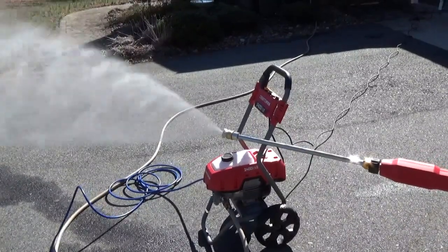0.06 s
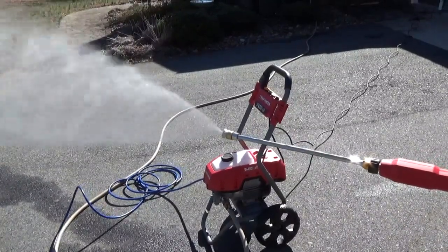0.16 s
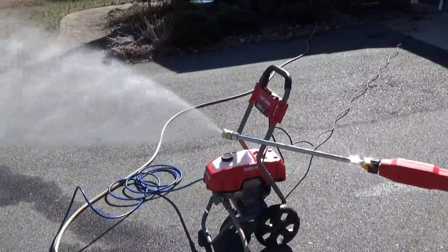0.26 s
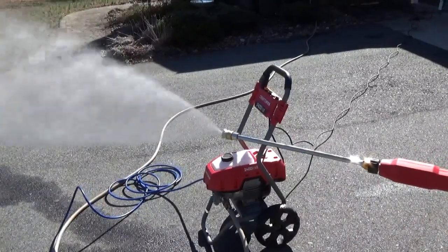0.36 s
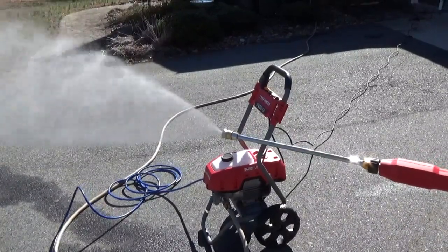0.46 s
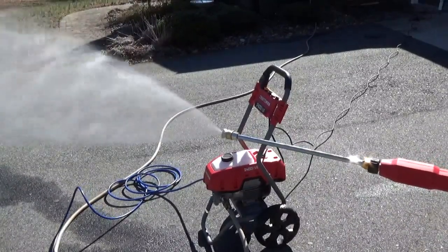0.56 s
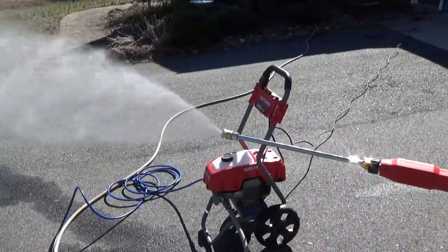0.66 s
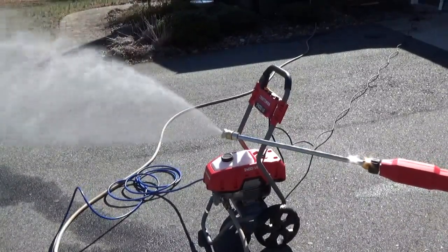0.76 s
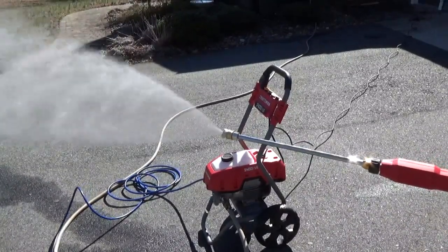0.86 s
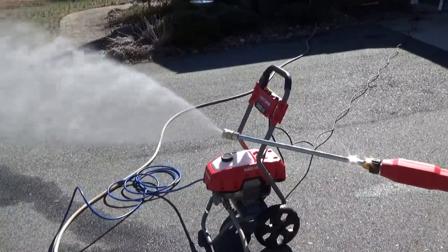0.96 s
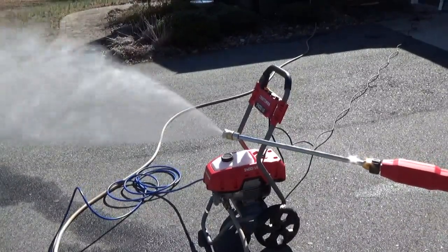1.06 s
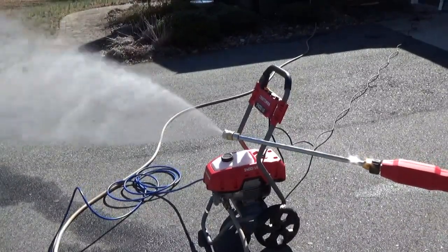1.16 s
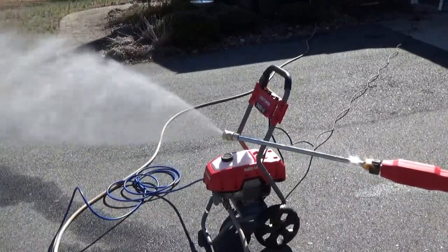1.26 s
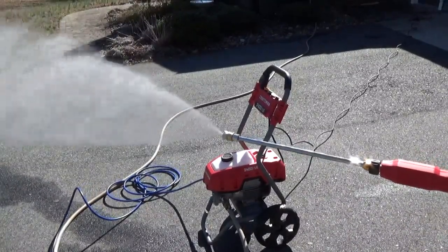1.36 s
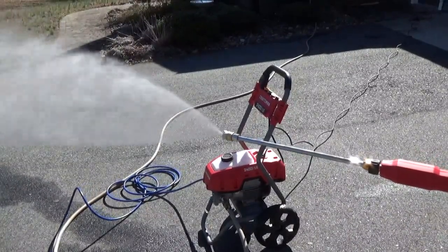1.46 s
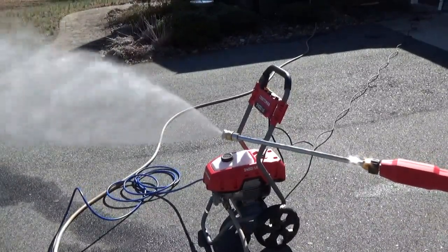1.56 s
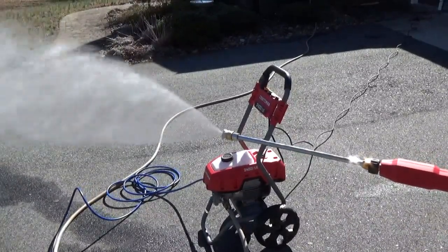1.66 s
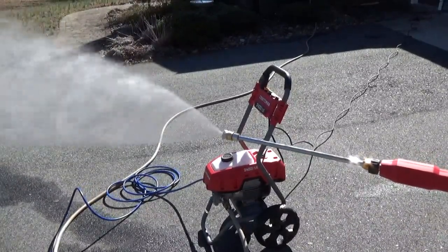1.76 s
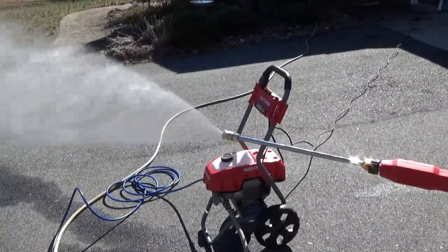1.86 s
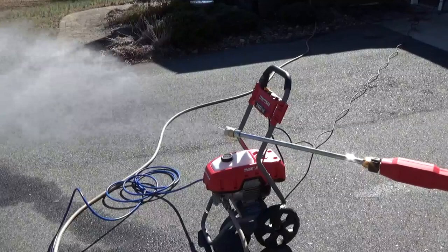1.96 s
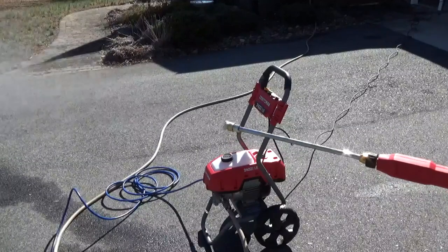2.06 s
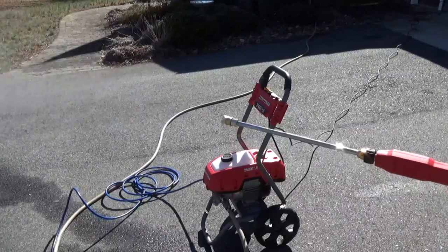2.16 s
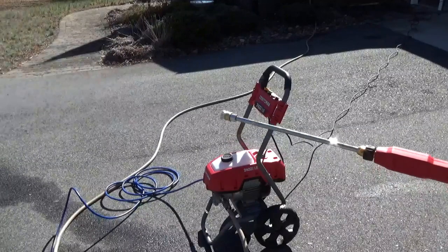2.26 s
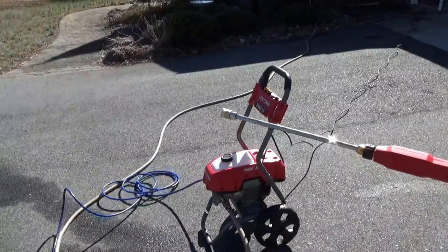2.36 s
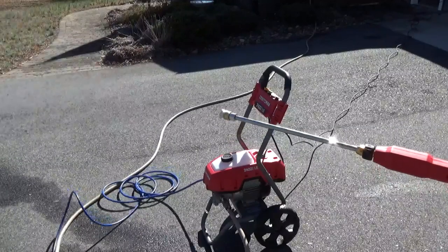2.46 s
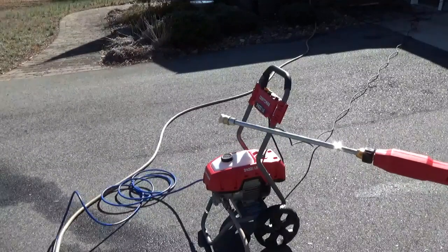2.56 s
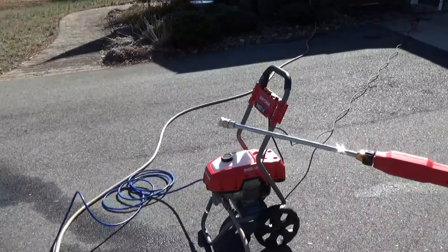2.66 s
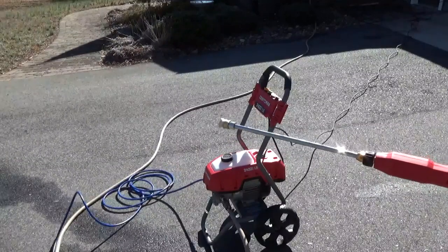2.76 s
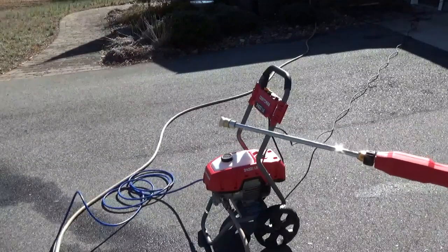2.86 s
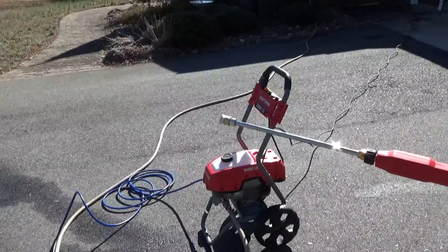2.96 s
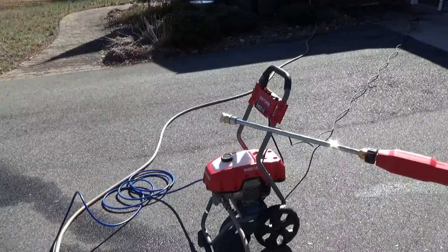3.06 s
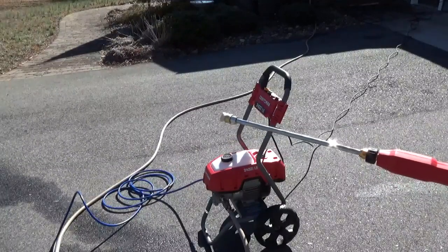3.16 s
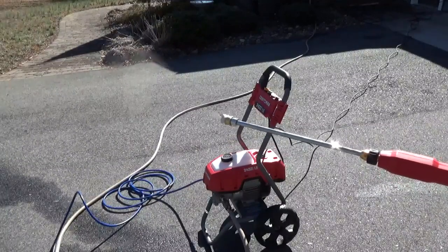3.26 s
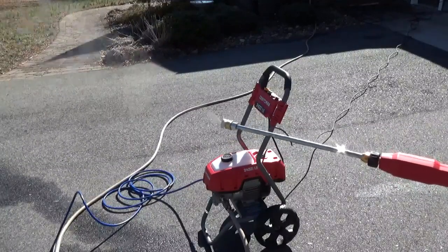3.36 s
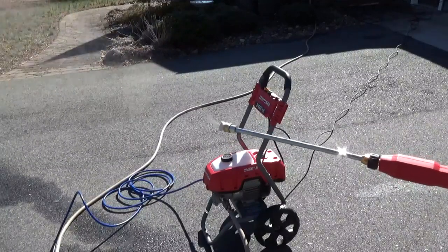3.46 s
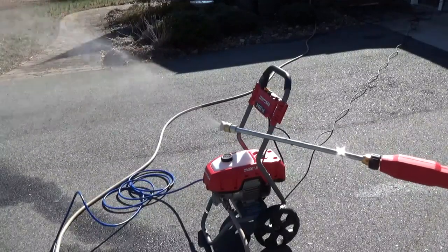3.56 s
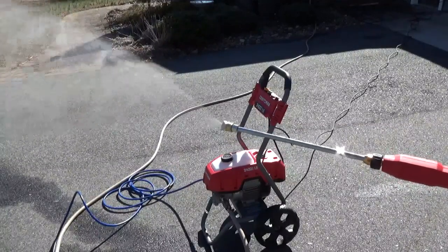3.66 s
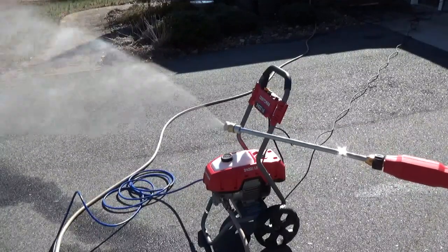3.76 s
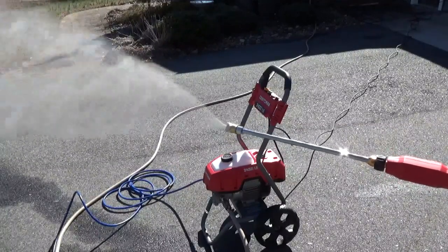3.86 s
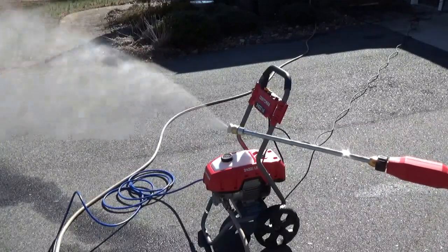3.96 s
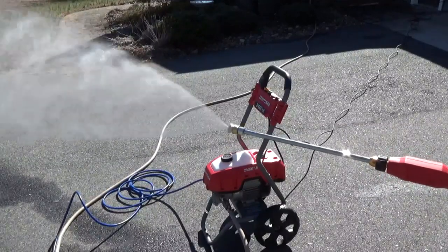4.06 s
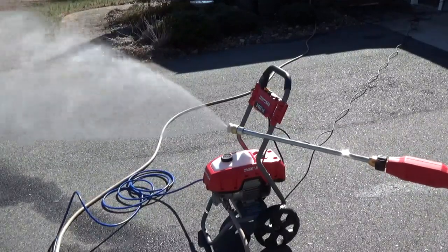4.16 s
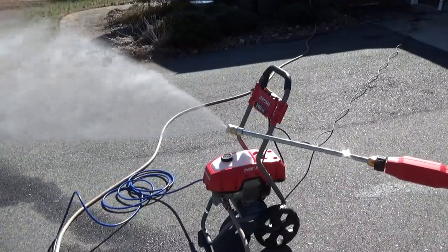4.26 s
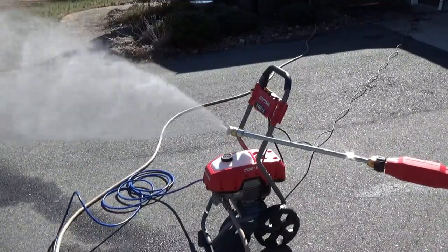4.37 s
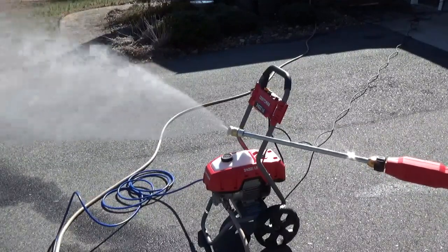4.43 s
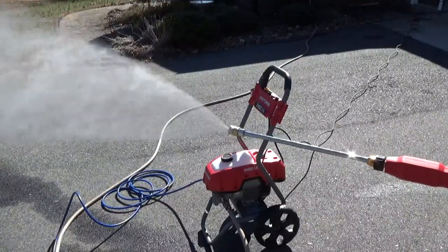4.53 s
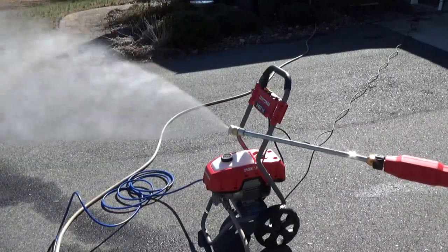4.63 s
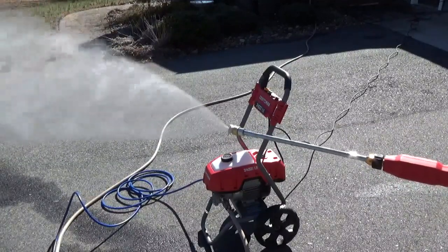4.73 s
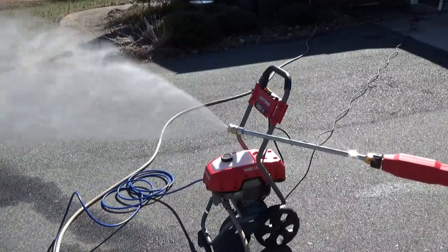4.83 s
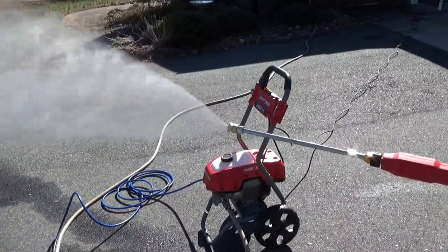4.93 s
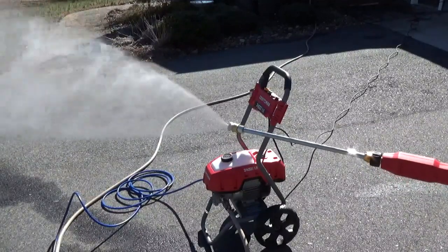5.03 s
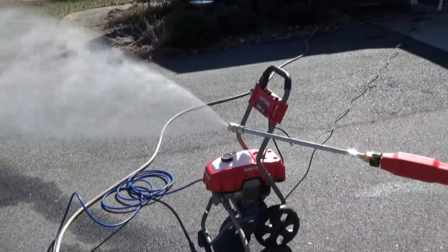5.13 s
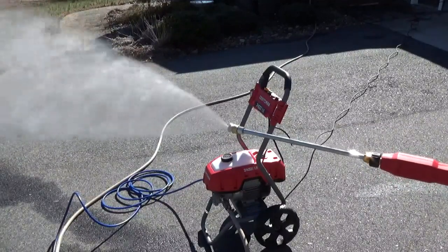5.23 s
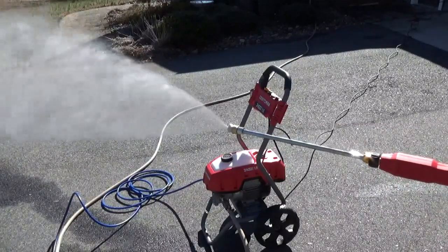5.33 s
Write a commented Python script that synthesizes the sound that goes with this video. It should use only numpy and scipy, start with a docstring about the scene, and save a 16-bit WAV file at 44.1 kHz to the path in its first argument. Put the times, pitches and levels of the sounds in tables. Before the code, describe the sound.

From 0 to about 2 s an electric pressure washer runs steadily outdoors: a loud, buzzing whine rich in overtones, a pulsing casing rattle, and a thin, bright hiss of spray. At 1.97 s the spray stops abruptly; the motor jolts and strains, sagging slightly in pitch, harsher and throbbing, with metallic valve ticking and chatter. At 2.34 s it cuts out with a brief airy vent and ringing groan, then a short squeal climbs and thins away by 2.6 s. The pause is very quiet: tiny ticks, a regular train of faint high insect chirps until about 3.05 s, dull far traffic. At 3.27 s a sharp tick and fading watery spurt arrive, then a small switch snap at 3.3 s. Near 3.5 s the motor catches with a groan and rattle, briefly overshoots in pitch and settles; full spray and whine continue steadily to the end. Close stereo, machine slightly right.

```python
"""A pressure washer's electric motor whines and rattles while its nozzle hisses over a driveway.
The trigger is released: the pump strains against the shut valve, cuts out, vents and squeals to a halt.
Insects chirp in the pause. The trigger is pulled: stored pressure spurts out, then the motor restarts.
The whine is a sum of sine waves at multiples of the shaft speed; hiss, rattle and groan are filtered noise;
the squeal is a climbing tone with overtones; chirps and clicks are short tones, some with a little noise."""
import sys
import numpy as np
from scipy.fft import rfft, irfft, next_fast_len
from scipy.io import wavfile
from scipy.ndimage import uniform_filter1d, map_coordinates

SR = 44100
rng = np.random.default_rng(int(sys.argv[2]) if len(sys.argv) > 2 else 0)


def pcm_store(signal):
    """Save signal as 16-bit PCM."""
    levels = np.round(np.clip(np.atleast_2d(signal), -1, 1) * 32767)
    wavfile.write(sys.argv[1], SR, levels.astype(np.int16).T)


N = 238051
T = np.arange(N) / SR  # the time of every sample (s)

# In the spectrum tables below, levels are per Hz and only their balance matters.
# Far traffic over time: time_s, level_db
TRAFFIC_LEVEL = [(2.6, -51.5), (2.85, -51), (2.95, -54.5), (3.25, -55)]
# Tone colour of the far traffic: pitch_hz, level_db
TRAFFIC_SPECTRUM = [(35, -14), (70, -0.5), (118, -5), (160, -1.5), (220, -5.5), (518, -12.5), (800, -13.5),
                    (1100, -12.5), (1800, -19), (2580, -24.5), (5000, -36.5), (12000, -60.5)]
# How alike left and right are in most of the noises: pitch_hz, likeness (1 = identical)
LIKENESS = [(60, 0.54), (170, 0.86), (480, 0.72), (1350, 0.84), (3820, 0.93), (10800, 0.92)]
# A late chirp, then a click ringing near 2700 Hz: start_s, low_note_change_db
LATE_SOUNDS = [(3.018, 0), (3.049, 5)]
# Short ticks: start_s, level_db, pitch_hz
TICKS = [(2.5405, -28, 10000), (2.5935, -45, 6300), (2.6322, -26, 9100), (2.633, -28, 7920),
         (2.6502, -33, 10120), (2.6575, -39, 9200), (2.695, -46, 6000), (3.0495, -40, 3300),
         (3.266, -10, 7000)]
# The pressure switch snapping: start_s, level_db
SWITCH_SNAPS = [(3.301, -27.5)]
# The switch's box ringing: pitch_hz, level_db, time_to_fall_60_db_s
SWITCH_RINGS = [(420, -4, 0.043), (660, 0.5, 0.037)]
# Tone colour of the venting: pitch_hz, level_db
VENT_SPECTRUM = [(2500, -21), (3500, -9.5), (4000, -12), (4400, -4), (4800, -1), (5100, -9), (5450, -5),
                 (6100, -8.5), (6900, -11), (8200, -10), (9500, -8.5), (11200, -20.5)]
# Narrow bands in the venting: pitch_hz, width_hz, level_db
VENT_BANDS = [(4800, 120, -1), (5400, 110, -1)]
# Resonances of the pump housing: pitch_hz, width_hz, level_db
HOUSING_MODES = [(819, 86, 2.5), (1280, 18, -3.5), (1462, 44, -3.5), (1850, 96, -1), (2157, 40, -2.5),
                 (2440, 36, -0.5), (2890, 30, -7), (3470, 200, -13.5)]
# The squeal's basic tone, then its overtones in order: level_db
SQUEAL_OVERTONES = [0, -5, -10, -18, -26, -25, -20, -28, -28, -26, -22, -24, -27]
# Tone colour of the nozzle's fan of spray: pitch_hz, level_db
SPRAY_SPECTRUM = [(1650, -43.5), (2800, -11), (2930, -10.5), (3790, -7), (6130, -0.5), (7800, 0),
                  (9870, -3), (11000, -7.5), (14300, -39), (22000, -120)]
# Stored pressure leaving the lance: time_s, level_db
SPURT_LEVEL = [(3.266, -19), (3.275, -20.5), (3.33, -22.5), (3.38, -29), (3.42, -31), (3.46, -27.5),
               (3.5, -21.5)]
# Tone colour of that spurt: pitch_hz, level_db
SPURT_SPECTRUM = [(150, -34), (500, -26), (800, -17), (1460, -13), (2250, -6.5), (4000, -2), (6540, 1),
                  (9910, -6), (11200, -12)]
# Mains water following the spurt: time_s, level_db
SURGE_LEVEL = [(3.27, -54.5), (3.33, -38.5), (3.4, -33.5), (3.48, -36)]
# The whine while spraying freely: shaft_multiple, level_db
FREE_WHINE = [(1, -37), (2, -39), (3, -27), (4, -29), (5, -26), (6, -23), (7, -26), (8, -30), (9, -14),
              (10, -27), (11, -20), (12, -16), (13, 0), (14, -11), (15, -22), (16, -25), (17, -24),
              (18, -23), (19, -25), (20, -22), (21, -25), (22, -23), (23, -30), (24, -23), (25, -18),
              (26, -15), (27, -24), (28, -20), (29, -15), (30, -12), (31, -8), (32, -11), (33, -18),
              (34, -14), (35, -21), (36, -11), (37, -18), (38, -16), (39, -24), (40, -17), (41, -17),
              (42, -15), (43, -20), (44, -18), (45, -25), (46, -20), (47, -16), (48, -22), (49, -24),
              (50, -24)]
# The whine against the shut valve: shaft_multiple, level_db
STRAINED_WHINE = [(1, -38.5), (2, -39.5), (3, -31.5), (4, -36), (5, -20), (6, -23.5), (7, -28), (8, -37),
                  (9, -13), (10, -31), (11, -39), (12, -10.5), (13, -5.5), (14, -2.5), (15, -7),
                  (16, -10.5), (17, -11), (18, -13), (19, -11), (20, -19.5), (21, -10), (22, -28),
                  (23, -15), (24, -36), (25, -16), (26, -8), (27, -35), (28, -26), (29, -15), (30, -13),
                  (31, -5), (32, -1), (33, -9.5), (34, -6), (35, -17), (36, -13), (37, -10), (38, 0),
                  (39, -18), (40, -9), (41, -13), (42, -17), (43, -3.5), (44, -17), (45, -26), (46, -21),
                  (47, -10), (48, -24), (49, -7.5), (50, -15)]
# Multiples that jump as the valve shuts: shaft_multiple, change_db
SHUTTING_CHANGE = {5: 5, 6: 4, 9: 4, 12: 10.4, 13: 1.8, 14: 6.3, 18: 7.5, 25: 17, 30: 4, 31: -11, 32: 10,
                   34: 10.6, 37: 5, 38: 6, 39: 15, 40: 9.7, 43: 13, 49: 11}
# Multiples that differ while the restarted pump runs light: shaft_multiple, change_db
LIGHT_CHANGE = {3: -8, 4: -6, 5: -7, 7: -1, 8: -8, 9: 7.1, 12: -8, 13: 1.7, 15: 8.6, 25: 14, 26: -10}
# Lasting change after the restart: shaft_multiple, change_db
RESTART_CHANGE = {6: -3, 12: -1, 13: 1.5, 26: -1, 30: 3, 32: -2.5, 33: -6, 34: -1.5, 35: -4, 43: -4}
# Strong groups in the whine, the low one wavering and the high one pulsing: centre_multiple, phase_bend_rad
STRONG_GROUPS = [(14.5, np.pi), (31.5, .5)]
# Tone colour of the rattling casing: pitch_hz, level_db
CASING_SPECTRUM = [(40, -50), (150, -12.5), (400, -10.5), (780, -1), (1150, -5.5), (1350, -4.5),
                   (1900, 0.5), (2700, -3.5), (3500, -6), (3650, -30), (3900, -14), (8000, -18),
                   (9000, -17.5), (12000, -26)]
# Valve parts ringing: pitch_hz, width_hz, level_db
VALVE_MODES = [(3390, 160, -1.5), (4050, 19, 4.5), (4160, 100, -5), (4800, 39, 0), (5530, 64, -6),
               (6300, 230, -8), (7250, 41, 0.5), (7720, 78, -5), (8230, 270, -9), (9200, 230, -13)]

TOP_HZ = 11010  # the band limit
RELEASE_S, CUT_S, START_S = 1.972, 2.338, 3.49  # trigger released, motor cut, motor running again
# An even train of insect chirps
CHIRP_S, CHIRP_GAP_S, CHIRP_COUNT = 2.6325, .0333, 12
LOW_NOTE_DB, HIGH_NOTE_DB, NOTE_SCATTER_DB = -55.5, -57, 1.8
# Hiss after the cut
VENT_RISE_S, VENT_DB, VENT_HOLD_S, VENT_FALL_DB_PER_S = .016, -23.5, 0.041, 201
WHISTLE_DB, SQUEAL_HISS_DB = -9, -23  # narrow bands against the hiss; hiss against the squeal
# Groan after the cut, dropping as the pump halts and swelling just before
GROAN_DB, GROAN_FALL_DB_PER_S = -17, 100
HALT_S, HALT_DROP_DB = 2.482, -9.5  # a quick drop, with a slower one beside it
JUDDER_S, JUDDER_WIDTH_S, JUDDER_DB = 2.457, .012, 2
# Groan at the restart
CATCH_DB, CATCH_RISE_DB_PER_S, CATCH_FALL_DB_PER_S, CATCH_LENGTH_S = -22, 520, 40, .12
# The squeal: it climbs ever faster while it thins out
SQUEAL_HZ, SQUEAL_CLIMB_HZ_PER_S2 = 800, 3300
SQUEAL_RISE_S, SQUEAL_HOLD_S, SQUEAL_END_S = .014, 0.025, 2.625
SQUEAL_TOP_DB, SQUEAL_THIN_DB = -27.5, -60
SQUEAL_FALL_DB_PER_S = 480  # on average
SQUEAL_TILT_DB = 4  # base treble lift per octave, scaled as the squeal thins
# The spray
JET_DB, JET_STOP_S, JET_RISE_DB_PER_S, JET_FULL_S = -19, 0.013, 340, 3.52
# Motor speed
RUN_RPM, CREEP_RPM_PER_S = 3497.5, .9  # free speed at the beginning and its slow creep
SAG_RPM, SAG_S = 280, .5  # speed lost against the shut valve, and its time constant
OVER_RPM, SETTLE_S = 38, .33  # overshoot at the restart, and its settling
LAG_RPM, CATCH_S = 72, .03  # lag at the restart, and its catching up
# Motor level
TONE_DB, SHUT_TONE_DB, LAG_TONE_DB = -20.5, 1.5, -8  # whine; change as the valve shuts and while lagging
EASE_DB, EASE_S = -3, .04  # the whine eases off just before the cut
RATTLE_DB, STRAIN_RATTLE_DB = -29, 2.5  # rattle; its rise under strain
JOLT_DB, JOLT_S = 4.5, 0.072  # rattle jolts at release and restart
BUILD_S, THROB_S = 0.049, 0.18  # the valve shuts, then strain grows
LIGHT_DULL_DB = -5  # upper multiples while the restarted pump runs light
# The valve under strain
TICK_DB, CHATTER_DB = -27, -33
SEAT_S, UNSEATED_DB, VALVE_FADE_DB_PER_S = 2.11, -5.5, 21


def amp(db):
    """Turn decibels into a plain multiplier."""
    return np.exp(np.asarray(db) * np.log(10) / 20)


def unit(x):
    """Scale a sound to an average (rms) strength of 1."""
    return x / np.sqrt(np.mean(x ** 2) + 1e-20)


def along(points, hz):
    """Read a pitch table between its points, on a logarithmic pitch axis."""
    f, value = np.transpose(points)
    return np.interp(np.log(hz + 1), np.log(f + 1), value)


def between(start_s, end_s):
    """A soft-edged gate: 1 between two times, 0 outside."""
    is_open = (T >= start_s) & (T <= end_s)
    return uniform_filter1d(is_open * 1., size=90, mode="nearest")


def ramp(start_s, length_s):
    """A straight rise from 0 to 1."""
    return np.clip((T - start_s) / length_s, 0, 1)


def fading(start_s, time_s):
    """0 before the start, then 1 dying away exponentially."""
    return (T >= start_s) * np.exp(-np.maximum(T - start_s, 0) / time_s)


def timeline(points):
    """A gate over the table's time span, and its level at every sample."""
    s, level_db = np.transpose(points)
    return between(s[0], s[-1]), np.interp(T, s, level_db)


def wobble(rate):
    """A smooth random curve with rate random points a second."""
    coarse = np.arange(0, N + 16, 16) / SR
    knots = rng.standard_normal(int(N * rate / SR) + 4)
    return np.interp(T, coarse, map_coordinates(knots, [coarse * rate]))


def filtered(x, response):
    """Reshape the spectrum of x by a response that depends on pitch."""
    m = next_fast_len(N + SR // 2)
    return irfft(rfft(x, m) * response(np.fft.rfftfreq(m, 1 / SR)), m)[..., :N]


def coloured(spectrum):
    """The filter described by a spectrum table."""
    return lambda hz: amp(along(spectrum, hz))


def resonant(modes):
    """The response of parts that ring at their own pitches, with alternating signs."""
    def response(f):
        total = 0
        for n, (centre, width, db) in enumerate(modes):
            drag = 1j * f * width
            total = total + (-1) ** n * amp(db) * drag / (centre * centre - f * f + drag)
        return total
    return response


def rush(gain, alike):
    """Filtered stereo noise of rms 1, its sides as alike as the table says."""
    def mid_and_side(hz):
        angle = np.arccos(np.clip(along(alike, hz), -1, 1)) / 2
        return gain(hz) * [np.cos(angle), np.sin(angle)]
    mid, side = filtered(rng.standard_normal((2, N)), mid_and_side)
    return unit(np.array([mid + side, mid - side]))


def add(track, s, db, hz, length):
    """Add a short tone under a bell-shaped envelope."""
    t = np.arange(int(length * SR)) / SR
    bell = np.sin(np.pi * t / length) ** 2
    track[round(s * SR):][:len(t)] += amp(db) * bell * np.sin(2 * np.pi * hz * t)


def street():
    """Far traffic is dull noise; light wind on the microphone openings is a low rumble."""
    _, traffic_db = timeline(TRAFFIC_LEVEL)
    traffic = rush(coloured(TRAFFIC_SPECTRUM), [(50, 0.322), (5000, 0.47)])
    wind = rush(resonant([(42, 25, 0)]), [(40, .7)])
    return amp(traffic_db + 1.19 * wobble(12)) * traffic + amp(-68.0 + 2.96 * wobble(3)) * wind


def insects_and_late_click():
    """Chirps, and one late click, are a high note then a low one, over a thin trill that fades."""
    trill_db = -71.0 - 30 * np.clip(T - 2.95, 0, 1) + 2.5 * wobble(33)
    track = amp(trill_db) * np.sin(2 * np.pi * 2960 * T)
    sounds = [(CHIRP_S + CHIRP_GAP_S * n, 0) for n in range(CHIRP_COUNT)] + LATE_SOUNDS
    scatter = NOTE_SCATTER_DB * rng.standard_normal((len(sounds), 2))
    for (s, db), (low_db, high_db) in zip(sounds, scatter):
        add(track, s - .003, HIGH_NOTE_DB + high_db, 3550, .006)
        add(track, s - .001, LOW_NOTE_DB + db + low_db, 2700, .011)
    return track


def clicks():
    """The switch makes its box ring briefly; ticks are very short tones mixed with bright noise."""
    track = np.zeros(N)
    t = np.arange(2000) / SR
    for s, db in SWITCH_SNAPS:
        ring = sum(amp(db + level - 60 * t / t60) * np.sin(2 * np.pi * hz * t)
                   for hz, level, t60 in SWITCH_RINGS)
        track[round(s * SR):][:len(t)] += ring * (1 - np.exp(-t / 0.0012))
    for s, db, hz in TICKS:
        crack = np.cos(2 * np.pi * hz * t) + .3 * np.diff(rng.standard_normal(len(t) + 1))
        track[round(s * SR):][:len(t)] += amp(db - 60 * t / 0.0022) * crack
    return track


def shudder():
    """A fast, random unsteadiness in level."""
    return amp(1.6 * wobble(120))


def squeal():
    """A climbing tone and its overtones as the pump halts; gives the level and the sound."""
    onset_s = HALT_S - .02
    pitch_hz = SQUEAL_HZ + SQUEAL_CLIMB_HZ_PER_S2 * np.clip(T - onset_s, 0, .2) ** 2
    turn = 2 * np.pi * np.cumsum(pitch_hz) / SR
    drop_db = SQUEAL_THIN_DB - SQUEAL_TOP_DB
    thinned = ramp(onset_s + SQUEAL_RISE_S + SQUEAL_HOLD_S, -drop_db / SQUEAL_FALL_DB_PER_S)
    gate = ramp(onset_s, SQUEAL_RISE_S) * between(0, SQUEAL_END_S)
    level = gate * amp(SQUEAL_TOP_DB + drop_db * thinned ** 0.72)
    tilt_db = SQUEAL_TILT_DB * np.interp(thinned, [0, .45, .9, 1], [0.12, 1, 1.3, 0.72])
    tone = np.zeros(N)
    for k, db in enumerate(SQUEAL_OVERTONES, 1):
        overtone_db = db + tilt_db * np.log2(k) + 4.1 * wobble(60)
        tone += amp(overtone_db) * np.sin(k * turn + .16 * k * wobble(90))
    return level, level * tone


def groan():
    """Noise ringing in the pump housing, once as the pump runs down and again as it catches."""
    judder_db = JUDDER_DB * np.exp(-((T - JUDDER_S) / JUDDER_WIDTH_S) ** 2)
    halt_db = HALT_DROP_DB * (ramp(HALT_S - .01, 0.018) + .6 * ramp(HALT_S, .12))
    fall_db = -GROAN_FALL_DB_PER_S * np.maximum(T - CUT_S, 0)
    stopping = between(CUT_S - .004, START_S - .5) * amp(GROAN_DB + halt_db + judder_db + fall_db)
    peak_s = START_S - .01
    catch_db = CATCH_DB - CATCH_RISE_DB_PER_S * np.maximum(peak_s - T, 0)
    catch_db = catch_db - CATCH_FALL_DB_PER_S * np.maximum(T - peak_s, 0)
    catching = between(0, START_S + CATCH_LENGTH_S) * amp(catch_db)
    housing = resonant(HOUSING_MODES)
    # a little plain noise between the ringing pitches
    walls = lambda f: 0.12 * (f > 300) * (f < 3500) + housing(f)
    return (stopping + catching) * shudder() * rush(walls, LIKENESS)


def rundown():
    """The pump vents with a hiss, groans and squeals to a halt; it groans again as it catches."""
    held = np.maximum(np.maximum(T - CUT_S, 0) - VENT_HOLD_S, 0)
    vent = ramp(CUT_S - VENT_RISE_S / 2, VENT_RISE_S) * amp(VENT_DB - VENT_FALL_DB_PER_S * held)
    squeal_level, squealing = squeal()
    hiss = vent + amp(SQUEAL_HISS_DB) * squeal_level
    whistle = amp(WHISTLE_DB) * rush(resonant(VENT_BANDS), LIKENESS)
    air = rush(coloured(VENT_SPECTRUM), LIKENESS) + whistle
    return hiss * shudder() * air + groan() + squealing


def nozzle():
    """The spray is a thin hiss; before the motor picks up, a spurt comes with a duller rush behind it."""
    flow = 1 - ramp(RELEASE_S, JET_STOP_S) + amp(-JET_RISE_DB_PER_S * np.maximum(JET_FULL_S - T, 0))
    jet_db = JET_DB + 0.38 * wobble(22) + 0.56 * wobble(250)
    jet = flow * amp(jet_db) * rush(coloured(SPRAY_SPECTRUM), LIKENESS)
    gate, spurt_db = timeline(SPURT_LEVEL)
    spurt = gate * amp(spurt_db + 0.7 * wobble(60)) * rush(coloured(SPURT_SPECTRUM), LIKENESS)
    gate, surge_db = timeline(SURGE_LEVEL)
    surge = gate * amp(surge_db) * rush(resonant([(1310, 2000, 0)]), LIKENESS)
    return jet + spurt + surge


def shaft_angle(first, light, lag):
    """The shaft sags against the shut valve; at the restart it lags briefly and settles from an overshoot."""
    sag = first * (1 - np.exp(-np.maximum(T - RELEASE_S, 0) / SAG_S))
    rpm = RUN_RPM + CREEP_RPM_PER_S * T - SAG_RPM * sag + OVER_RPM * light - LAG_RPM * lag
    return 2 * np.pi * np.cumsum(rpm / 60) / SR


def whine(turn, first, light, pressure, strain):
    """Rotor and pistons sound at multiples of the shaft speed, their balance set by pressure."""
    multiple, _ = np.transpose(FREE_WHINE)
    # Inside a strong group the starting phases follow a smooth bend; elsewhere they scatter.
    near = np.min([abs(multiple - c) for c, _ in STRONG_GROUPS], axis=0) < 2
    bend = sum(rad * (abs(multiple - c) < 2) for c, rad in STRONG_GROUPS)
    bend = bend + np.where(near, .3, 2.2) * rng.standard_normal(len(multiple))
    start = np.cumsum(np.cumsum(bend))
    throb = .3 * pressure + .7 * strain  # under strain the whine throbs instead
    tone = np.zeros((2, N))
    for k, offset, (_, free_db), (_, strained_db) in zip(multiple, start, FREE_WHINE, STRAINED_WHINE):
        loaded_db = (pressure - strain) * SHUTTING_CHANGE.get(k, 0) + strain * (strained_db - free_db)
        dull_db = LIGHT_DULL_DB * np.clip((k - 26) / 6, 0, 1)
        restart_db = light * LIGHT_CHANGE.get(k, dull_db) + ~first * RESTART_CHANGE.get(k, 0)
        level = amp(free_db + loaded_db + restart_db + 0.053 * k * wobble(7))
        # each multiple leaves another part of the casing, so left and right differ slightly
        lead, lean_db = rng.normal(0, [.09, .25])[:, None, None] * [[1], [-1]]
        throb_phase = 0.73 * throb * min((k - 13.5) ** 2, 6)
        phase = k * turn + offset - throb_phase + 0.02 * k * wobble(14) + lead
        tone += level * amp(lean_db) * np.sin(phase)
    return tone


def valve(turn, strokes):
    """The valve under strain ticks once a turn, and its parts chatter with the piston strokes."""
    seating_db = UNSEATED_DB * (1 - ramp(SEAT_S - .05, 0.061))
    valve_db = seating_db - VALVE_FADE_DB_PER_S * np.maximum(T - SEAT_S, 0)
    tick = np.exp(8 * (np.cos(turn + 0.96) - 1)) * rush(resonant([(8100, 600, 0)]), LIKENESS)
    chatter = strokes * rush(resonant(VALVE_MODES), LIKENESS)
    sound = amp(TICK_DB + valve_db) * tick + amp(CHATTER_DB + 0.5 * valve_db) * chatter
    return between(RELEASE_S, CUT_S) * sound


def motor():
    """The turning shaft drives the whine, a casing rattle that pulses with it, and the valve noise."""
    first = T < (CUT_S + START_S) / 2  # true until midway through the pause
    gate = between(0, CUT_S) + between(START_S, N / SR)
    light, lag = fading(START_S, SETTLE_S), fading(START_S, CATCH_S)
    pressure = first * ramp(RELEASE_S, BUILD_S)
    strain = first * ramp(RELEASE_S + BUILD_S, THROB_S)
    turn = shaft_angle(first, light, lag)
    ease_db = EASE_DB * first * ramp(CUT_S - EASE_S, EASE_S)
    tone_db = TONE_DB + SHUT_TONE_DB * pressure + LAG_TONE_DB * lag + ease_db
    jolt_db = JOLT_DB * (fading(RELEASE_S, JOLT_S) + fading(START_S, JOLT_S))
    rattle_db = RATTLE_DB + STRAIN_RATTLE_DB * strain + jolt_db
    tone = whine(turn, first, light, pressure, strain)
    # three pistons
    strokes = 1 + 0.14 * np.sin(turn) + 0.22 * np.sin(3 * turn) + 0.19 * np.sin(6 * turn)
    rattle = strokes * rush(coloured(CASING_SPECTRUM), LIKENESS)
    return gate * (amp(tone_db) * tone + amp(rattle_db) * rattle) + valve(turn, strokes)


def scene():
    """The machine and small sounds lie to the right; the lance is nearer the middle."""
    surroundings = (street() + insects_and_late_click() + clicks()) * amp([[-.8], [.8]])  # left, right (dB)
    machine = (rundown() + motor()) * amp([[-.9], [.9]])
    return surroundings + nozzle() * amp([[-.35], [.35]]) + machine


def record(dry):
    """The microphones add a faint hiss; sound falls away steeply above the band limit."""
    hiss = amp(-63.0) * rush(lambda hz: hz > 0, [(1000, 0.598)])
    return filtered(dry + hiss, lambda hz: amp(-.48 * np.maximum(hz - TOP_HZ, 0)))


dry = scene()
out = record(dry)
pcm_store(out)
```